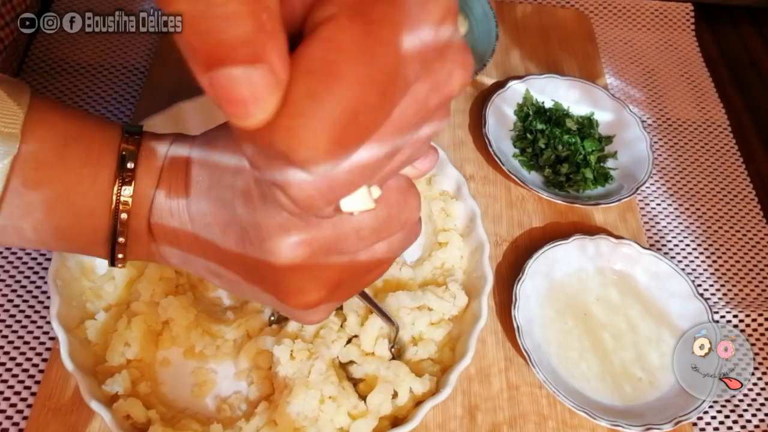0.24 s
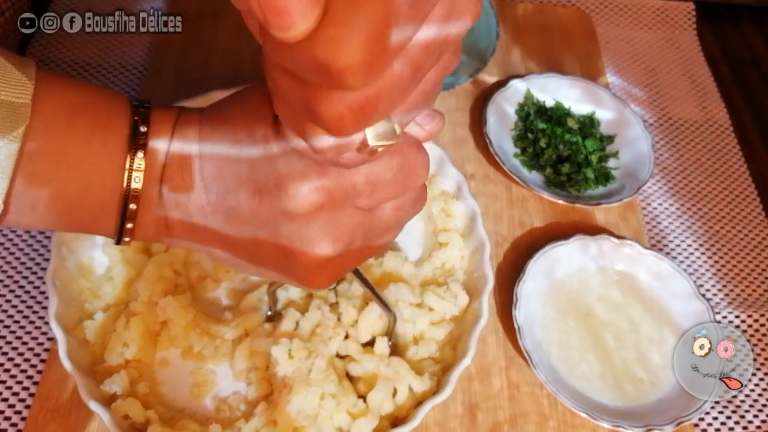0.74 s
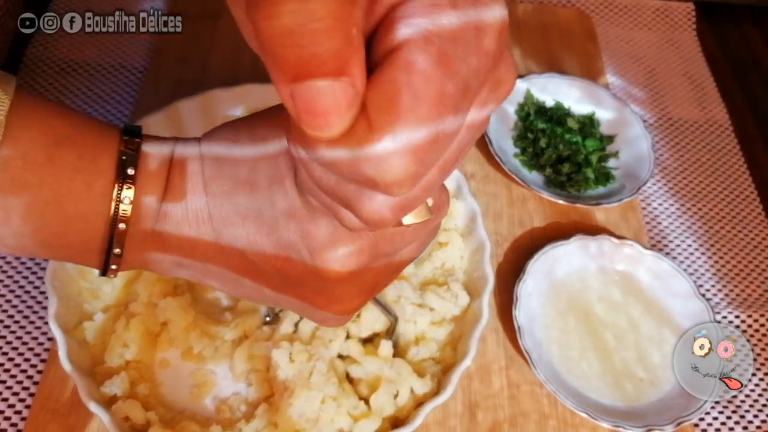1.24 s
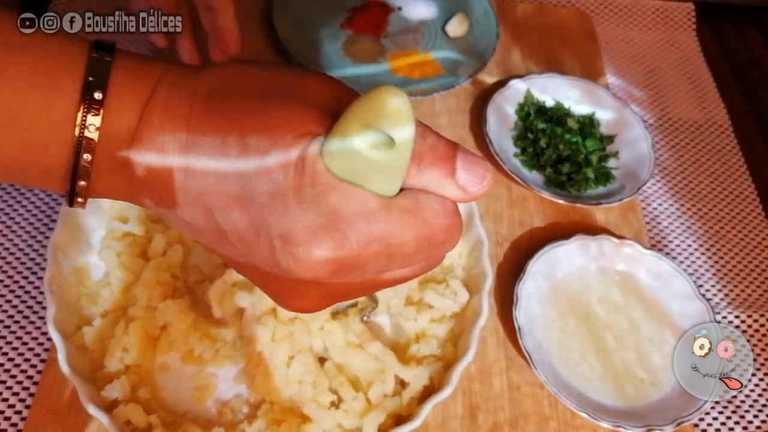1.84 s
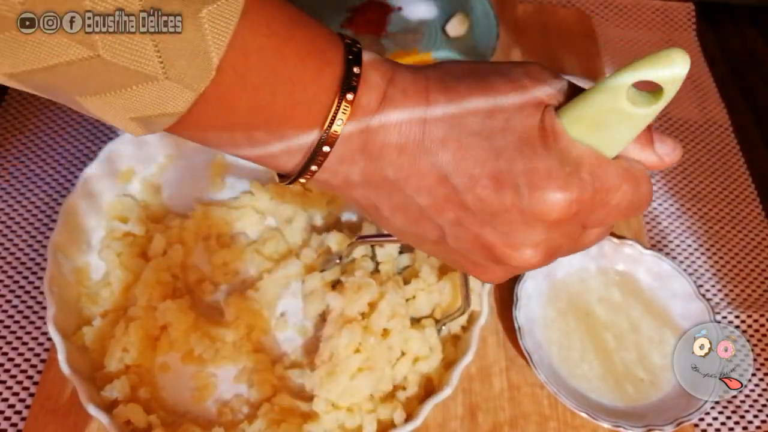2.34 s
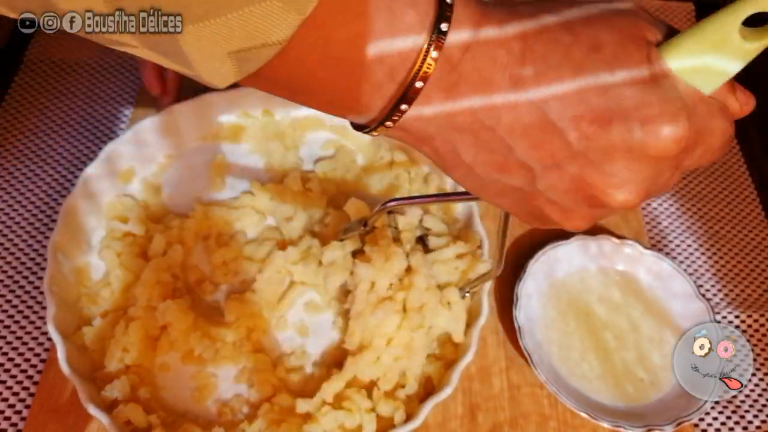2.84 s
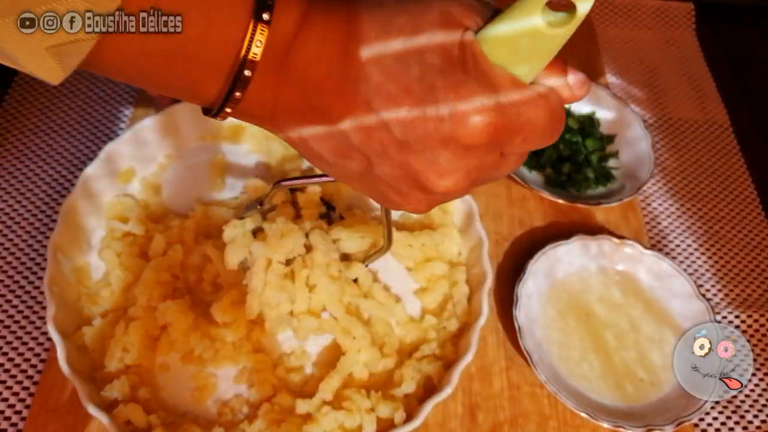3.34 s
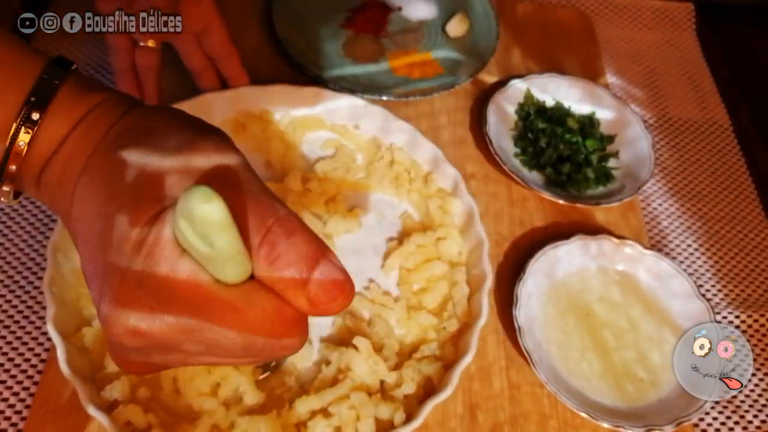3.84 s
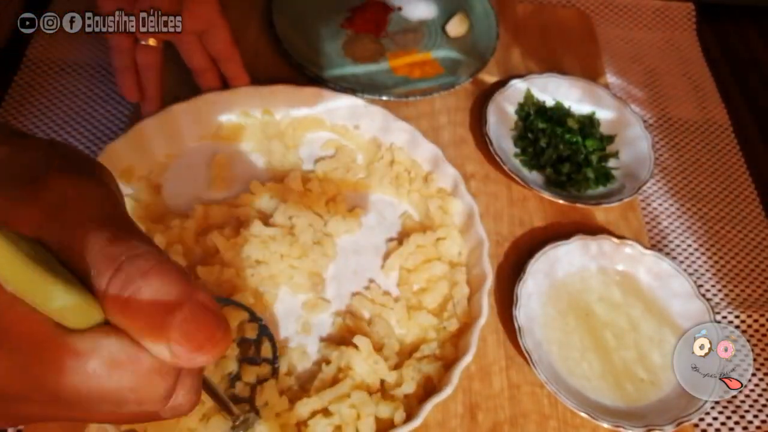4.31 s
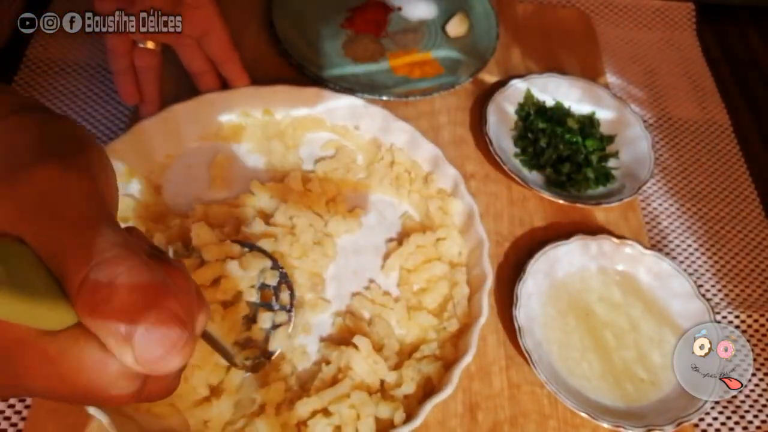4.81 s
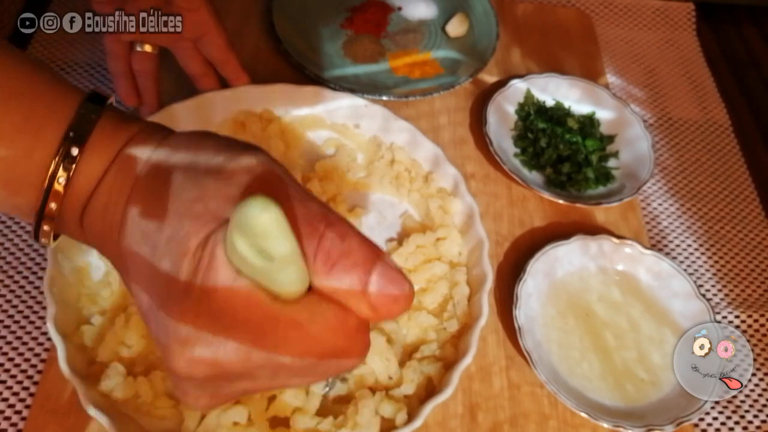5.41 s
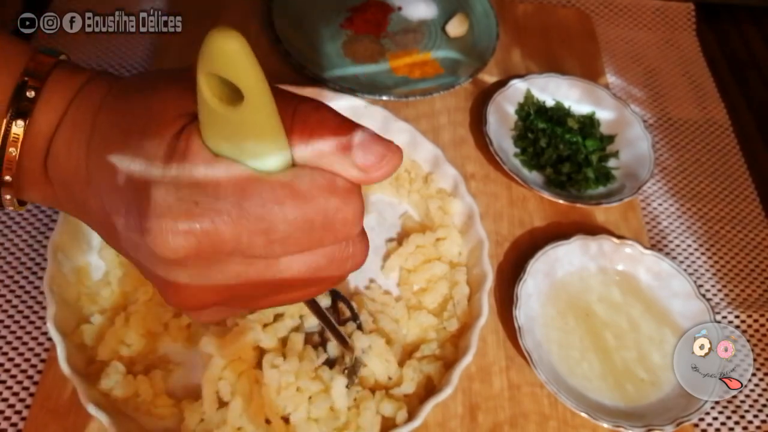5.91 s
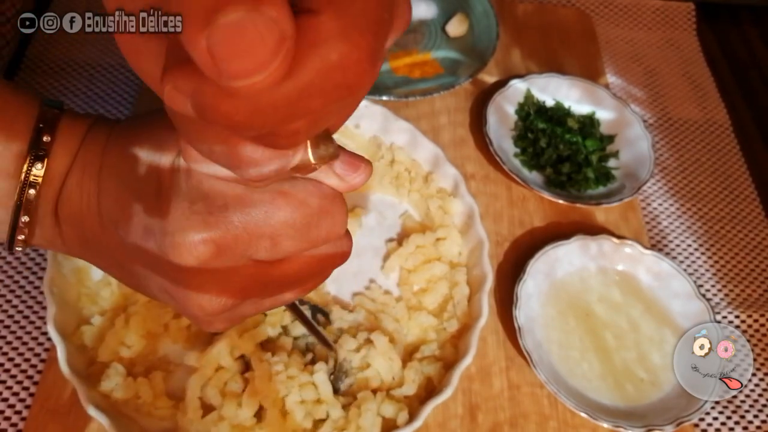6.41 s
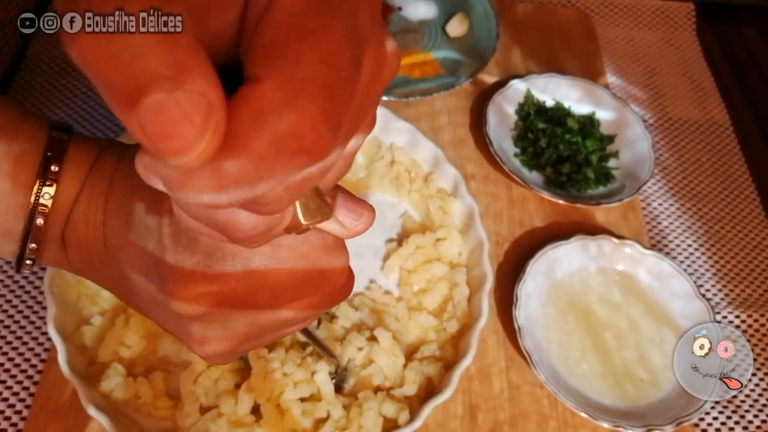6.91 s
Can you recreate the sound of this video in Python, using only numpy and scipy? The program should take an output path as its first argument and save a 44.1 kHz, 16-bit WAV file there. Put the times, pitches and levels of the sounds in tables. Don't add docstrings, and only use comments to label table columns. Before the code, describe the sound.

Close stereo pickup of potato being mashed on a table: low, hollow bowl-and-table thuds with short ringing, soft crunch after each blow, tiny sticky ticks and faint moist fizz between. After a strong first thud comes a pause, then knocks of varied strength, one quick scrape, a faint clink, a hard heavy blow, and a dull last knock over quiet room rumble and hiss.

```python
import sys
import numpy as np
from scipy import signal
from scipy.fft import rfft, irfft
from scipy.io import wavfile

SR = 44100
rng = np.random.default_rng(int(sys.argv[2]) if len(sys.argv) > 2 else 0)


def gain_from_decibels(decibels):
    exponent = np.asarray(decibels, float) / 20
    return 10 ** exponent


def file_out(sig):
    cols = np.atleast_2d(sig).T
    lim = np.clip(cols, -1, 1)
    pcm = np.round(lim * 32767).astype(np.int16)
    wavfile.write(sys.argv[1], SR, pcm)


N = 315756
TIME = np.arange(N) / SR

# [t/s, blow level/dB, boom level/dB, hardness above 2 kHz/dB, left-right level/dB]
KNOCKS = [
    (0.0731, -13.5, -25.5, -4, -2),
    (1.6758, -38.5, -52, 7, 3),
    (2.2767, -29, -43, 9.5, 4),
    (2.8057, -19, -31.5, 3, 4),
    (3.5184, -17, -31.5, 5.5, 2.5),
    (4.2832, -21, -33.5, 3, 6.5),
    (5.2393, -14, -28, 7.5, 2),
    (5.7290, -33, -45, 9.5, -6.5),
    (6.2533, -33.5, -32, 2, -1),
    (7.0357, -21.5, -28, -5.5, 4),
]


def rms_one(x):
    return x / np.sqrt(np.mean(x ** 2) + 1e-20)


def at_hz(points, hz):
    table_hz, values = np.transpose(points)
    return np.interp(np.log(np.maximum(hz, 1)), np.log(table_hz), values)


def in_time(rows):
    return gain_from_decibels(np.interp(TIME, *np.transpose(rows), left=-140, right=-140))


def panned(x, pan_db):
    return x * gain_from_decibels(np.array([[.5], [-.5]]) * pan_db)


def colour(x, points, share=1):
    size = 16384
    curve_db = share * at_hz(points, np.fft.rfftfreq(size, 1 / SR))
    cepstrum = irfft(np.log(gain_from_decibels(curve_db)))
    cepstrum[1:size // 2] *= 2
    cepstrum[size // 2 + 1:] = 0
    response = irfft(np.exp(rfft(cepstrum)))
    return signal.fftconvolve(x, response[None], axes=-1)[:, :N]


def ring(hz, level_db, t60, size, lead=0):
    t = TIME[:size]
    return gain_from_decibels(level_db - 60 * t / t60) * np.sin(2 * np.pi * hz * t + lead)


def drift(rate):
    knots = rng.standard_normal(400)
    return 0.68 * np.interp(TIME * rate, np.arange(400), knots)


def stereo_noise(size):
    # [f/Hz, left-right likeness/1]
    likeness = [(30, 0.87), (60, 0.68), (150, 0.83), (380, 0.82), (950, 0.029), (2400, 0.0059),
                (15000, .01)]
    alike = at_hz(likeness, np.fft.rfftfreq(size, 1 / SR))
    mid, side = rfft(rng.standard_normal((2, size)))
    return irfft(np.sqrt(1 + alike) * mid + np.sqrt(1 - alike) * side * [[1], [-1]], size)


def grains(per_s, spread_db):
    born = rng.random((3, N)) < per_s / SR
    size_db = spread_db * np.minimum(rng.exponential(1, (3, N)), 4)
    clicks = born * gain_from_decibels(size_db) * rng.choice([-1, 1], (3, N))
    return clicks[:2] + 0.52 * clicks[2]


def bursts(events):
    size = 16000
    out, t = np.zeros((2, N + size)), TIME[:size]
    for s, peak_db, hz, pan_db, t60 in events:
        noise = rng.standard_normal((3, size))
        swell = 1 - np.exp(-t / (0.29 * t60 ** 2 + 1e-4))
        burst = (noise[:2] + 0.46 * noise[2]) * gain_from_decibels(peak_db + 5 - 60 * t / t60) * swell
        spread = 1.5 if t60 < .09 else 1.25
        band = signal.butter(1, [hz / spread, min(hz * spread, 15000)], "band", fs=SR)
        i = round(s * SR)
        out[:, i:i + size] += panned(signal.lfilter(*band, burst), pan_db)
    return out[:, :N]


def room_tail(size, points):
    # [f/Hz, t60/s]
    tail_t60 = [(130, 0.58), (420, 0.45), (1100, 0.43), (2900, 0.39), (8000, 0.4)]
    white, out, t = stereo_noise(size), 0, TIME[:size]
    for hz in 125 * 2. ** np.arange(7):
        octave = signal.butter(2, [hz / 2 ** .5, hz * 2 ** .5], "band", fs=SR, output="sos")
        late = gain_from_decibels(-60 * t / at_hz(tail_t60, hz))
        early = gain_from_decibels(8 - 60 * t / 0.016)
        out = out + signal.sosfilt(octave, white) * (late + early)
    return colour(out * (1 - np.exp(-t / 0.00092)), points)[:, :size]


def rumble():
    # [f/Hz, spectral level/dB per Hz]
    rumble_colour = [(12, -37), (27, -28.5), (41, 2.5), (53, -11), (64, -3), (80, -20), (102, -6.5),
                     (118, -10.5), (135, -16), (180, -51)]
    level_db = -55 + 1.5 * drift(5)
    return gain_from_decibels(level_db) * rms_one(colour(stereo_noise(N), rumble_colour))


def shifting_mash():
    # [t/s, level/dB]
    mash = [(0.0, -62), (1.54, -66), (3.81, -64.5), (4.77, -65.5), (6.28, -62), (6.84, -65), (7.16, -62.5)]
    # [f/Hz, spectral level/dB per Hz]
    mash_colour = [(110, -20.5), (145, -9), (195, 1.5), (250, -7), (290, -10.5), (520, -11.5), (700, -14.5),
                   (900, -16), (1300, -21), (2600, -42), (5000, -84)]
    return gain_from_decibels(1.5) * in_time(mash) * rms_one(colour(stereo_noise(N), mash_colour))


def hiss():
    # [f/Hz, spectral level/dB per Hz]
    hiss_colour = [(600, -31), (1100, 0), (1500, 2), (2500, 3.5), (2950, 3), (3350, 0.5), (3900, -10.5),
                   (4600, -6.5), (5200, -0.5), (6300, -2), (7700, -19), (9600, -11.5), (12200, -42),
                   (14900, -19), (16000, 1.5)]
    level_db = -65 + 0.2 * drift(5.1)
    return gain_from_decibels(level_db) * rms_one(colour(stereo_noise(N), hiss_colour))


def whine():
    # [f/Hz, rms level/dB]
    tones = [(545, -86.5), (2914, -86.5)]
    out = 0
    for hz, db in tones:
        level_db = db + 7.5 + 0.99 * drift(3.92)
        out = out + gain_from_decibels(level_db) * np.sin(2 * np.pi * hz * TIME + 2.7 * drift(4.3))
    return out


def squeezes():
    # [peak t/s, peak level/dB, length/s]
    squeeze_events = [(0.0, -70.5, .1), (0.407, -74, 0.1), (0.504, -67, 0.033), (.56, -65, 0.095),
                      (0.864, -73, 0.75), (1.612, -69.5, 0.35), (1.816, -70.5, 0.076), (2.125, -70.5, 0.26),
                      (2.36, -63.5, 0.12), (2.485, -70, 0.16), (2.96, -72.5, 0.21), (3.126, -71, 0.17),
                      (3.798, -76, 0.13), (3.938, -64.5, 0.062), (4.278, -85, 0.084), (4.612, -69.5, 0.18),
                      (4.699, -66.5, 0.095), (5.017, -68.5, 0.14), (5.22, -73, 0.64), (5.62, -70.5, 0.3),
                      (6.07, -74, 0.19), (6.209, -63.5, 0.092), (6.311, -61.5, 0.12), (6.893, -71, 0.89),
                      (7.042, -65, 0.033), (7.16, -69, .12)]
    swell_db, fade_db, seep_db = 17.5, 22.5, -82.5
    power = gain_from_decibels(seep_db) ** 2
    for s, peak_db, length in squeeze_events:
        late = (TIME - s) / length
        power = power + gain_from_decibels(peak_db + np.minimum(swell_db * late, -fade_db * late)) ** 2
    return np.sqrt(power)


def squelch():
    # [f/Hz, spectral level/dB per Hz]
    squelch_colour = [(880, -44.5), (1500, -2.5), (2120, -30), (2880, -6), (3960, -14), (5170, -5),
                      (7760, -11.5), (9560, -9), (12100, -18.5), (14900, -14.5), (16000, -36)]
    pops = rms_one(grains(1500 * gain_from_decibels(4 * drift(25)), spread_db=8.5))
    wet = colour(0.7 * pops + 0.68 * stereo_noise(N), squelch_colour)
    return gain_from_decibels(4) * squeezes() * rms_one(wet)


def ticks():
    # [t/s, peak level/dB, f/Hz, left-right level/dB]
    releases = [(0.068, -66, 5400, 6), (0.493, -46.5, 5130, -12.5), (0.547, -60, 5100, -4),
                (1.8044, -52, 7000, 7), (2.278, -40.5, 9700, 11.5), (3.0558, -55, 5900, -4),
                (3.9168, -52, 5300, -4), (4.3050, -56, 5540, 20), (4.474, -58, 9500, 12),
                (4.591, -52, 9500, 11), (4.6765, -45.5, 9500, 19), (5.476, -53.5, 6100, 4),
                (5.9176, -53, 6000, 7), (6.1725, -50, 10000, 6), (6.96, -51, 9500, 7),
                (7.1200, -55, 5930, 0), (0.494, -45, 13500, 0), (3.898, -60, 13000, 0),
                (3.928, -49.5, 5600, -7), (4.045, -65, 9000, 7)]
    t60 = 0.014
    return bursts([(*row, t60) for row in releases])


def struck(modes, luck, size):
    longest_ring = .28
    mode_hz = np.array(modes)[:, 0]
    leads = np.cos(2.25 * np.arange(len(modes))) * np.minimum(mode_hz / 500, 1.3)
    rings = 0
    for (hz, db, t60, pan_db), v, lead in zip(modes, luck, leads):
        port_lead = lead * np.array([[.5], [-.5]])
        mode = ring(hz * (1 + v / 120), db - 15.5 + 2.64 * v, min(t60, longest_ring), size, port_lead)
        rings = rings + panned(mode, pan_db)
    return -rings * (1 - np.exp(-(TIME[:size] / 0.0025) ** 2))


def first_swing(t):
    # [f/Hz, level/dB, time to peak/ms]
    thump = [(406, -5, 1.7), (1020, -19.5, 0.98), (1603, -19, 0.75), (2680, -26.5, 0.62)]
    out = 0
    for hz, db, ms in thump:
        x = t * 1000 / ms
        out = out - gain_from_decibels(db) * x * np.exp(1 - x) * np.sin(2 * np.pi * hz * t)
    return out


def knocks():
    # [f/Hz, level/dB, t60/s]
    boom_modes = [(102.03, -1, 0.6), (114, -10, 0.51), (66, -14, 0.32)]
    # [f/Hz, level/dB, t60/s, left-right level/dB]
    body_modes = [(295, -20, 0.61, 21), (351.8, -2, 0.44, 10), (365, -1.5, 0.6, 1), (400, -12, 0.57, -19.5),
                  (456, -6.5, 0.44, 14), (458, -11.5, 0.46, 20), (562, -27, 0.095, 13),
                  (671, -3.5, 0.098, 6), (753, -28.5, 0.45, -4), (999, -20.5, 0.16, 17),
                  (1080, -10, 0.11, -2), (1288, -25.5, 0.27, -11), (1500, -16, 0.15, 2),
                  (2350, -45, 0.39, 21), (2870, -38.5, 0.31, 21)]
    # [f/Hz, level/dB, t60/s, left-right level/dB]
    thud_modes = [(160, -23, 0.85, -10), (173.9, 2, 0.36, -4), (197.6, 2.5, 0.29, 4.5),
                  (240.4, -2, 0.27, 1)]
    # [f/Hz, spectral level/dB per Hz]
    tail_colour = [(76, -8.5), (130, -3), (289, -9.5), (373, -5), (609, -8.5), (1280, -21), (2210, -29.5),
                   (3360, -36), (4110, -56.5), (5590, -38.5), (10000, -105), (13000, -61), (22000, -120)]
    # [blow level/dB, knock level/dB]
    bite = [(-32.5, -7), (-28, 7), (6, 1.5), (-13, -3)]
    size = 40000
    out, t = np.zeros((2, N + size)), TIME[:size]
    tails = np.array([room_tail(size, tail_colour), room_tail(size, tail_colour)])
    tails *= gain_from_decibels(-23.5) / np.sqrt(np.mean(tails[..., :4000] ** 2))
    luck = rng.standard_normal((len(KNOCKS), 2, len(body_modes)))
    first = first_swing(t)
    boom = sum(ring(*mode, size) for mode in boom_modes) * (1 - np.exp(-t / 0.0016))
    for (s, blow_db, boom_db, hard_db, pan_db), (vary, vary_low) in zip(KNOCKS, luck):
        thud_db = -6 + 0.36 * blow_db + 0.33 * boom_db
        knock_db = np.interp(blow_db, *np.transpose(bite))
        turn = vary_low[-1]
        tail = np.cos(turn) * tails[0] + np.sin(turn) * tails[1]
        blow = panned(first, pan_db) + struck(body_modes, vary, size) + tail
        contact = [(140, -4), (250, -3), (520, -3), (750, knock_db), (1600, hard_db), (6000, 1.63 * hard_db)]
        blow = colour(blow, contact)[:, :size]
        thud = struck(thud_modes, vary_low, size)
        i = round(s * SR)
        out[:, i:i + size] += gain_from_decibels(blow_db) * blow + gain_from_decibels(boom_db) * boom - gain_from_decibels(thud_db) * thud
    return out[:, :N]


def cracks():
    # [t/s, peak level/dB, f/Hz, left-right level/dB]
    contacts = [(0.074, -45.5, 5400, 3), (1.6755, -43.5, 2500, -11), (2.2778, -31, 2950, -8.5),
                (2.2778, -41, 4900, 8), (2.807, -57, 3000, 0), (3.52, -41.5, 2980, -7.5),
                (4.2836, -49.5, 3000, -4), (4.7048, -63, 3000, 0), (5.2408, -47, 4370, -12),
                (5.7292, -54, 2170, 12), (6.245, -46, 5800, -4), (6.2526, -47, 6000, 0),
                (6.2537, -44, 2500, -14), (7.0362, -60, 3000, -2), (0.196, -50, 1500, -3),
                (4.7042, -47, 1300, 8)]
    t60 = 0.016
    return bursts([(*row, t60) for row in contacts])


def grit():
    # [f/Hz, level re blow/dB, t60/s]
    crunch = [(1490, -28.5, 0.37), (2600, -36.5, 0.31)]
    events = []
    for s, blow_db, _, hard_db, pan_db in KNOCKS:
        for hz, db, t60 in crunch:
            events.append((s + .004, blow_db + db + 0.8 * hard_db, hz, pan_db, t60))
    return bursts(events)


def slumps():
    # [t/s, peak level/dB, f/Hz, left-right level/dB, t60/s]
    slides = [(1.674, -38.5, 1120, -5, 0.091), (1.68, -33.5, 440, 5, 0.3), (6.256, -36, 330, -3, 0.22),
              (2.281, -28, 530, 1, 0.17), (3.5, -53, 5300, -4, 0.28), (4.96, -43, 850, -2, 0.47),
              (6.3, -54, 1900, 10, 0.26), (.53, -56, 5100, -10, 0.18), (7.042, -48, 1000, 4, 0.16),
              (5.2, -67, 13000, -3, .3), (7.152, -50, 1700, 5, 0.038)]
    return bursts(slides)


def scrape():
    # [t/s, level/dB]
    drag = [
        (2.285, -60),
        (2.31, -63),
        (2.335, -49.5),
        (2.36, -48.5),
        (2.39, -48.5),
        (2.415, -55),
        (2.44, -67),
        (2.478, -64),
        (2.52, -76),
    ]
    # [f/Hz, spectral level/dB per Hz]
    scrape_colour = [(290, -26), (500, 4.5), (851, -19), (1390, -2.5), (1830, -8.5), (2430, -3.5),
                     (3190, -7.5), (6310, -12), (7430, -27), (13000, -58)]
    slips = grains(1900 * gain_from_decibels(4 * drift(50)), spread_db=2.5)
    return in_time(drag) * rms_one(colour(slips, scrape_colour))


def clink():
    # [f/Hz, level/dB, free t60/s]
    wires = [(1518, -9, 1.0), (2412, -5.5, .4), (3284, -10, .45), (4200, -11, .14), (5208, -9, .3),
             (6288, -8, .2), (7500, -12, .1)]
    size, clink_s, clink_db = 16000, 4.705, -54
    out = np.zeros((2, N))
    i = round(clink_s * SR)
    out[:, i:i + size] += sum(ring(hz, db + clink_db, .45 * t60, size) for hz, db, t60 in wires)
    return out


def in_housing(x):
    # [f/Hz, level/dB]
    housing = [(3000, -0.5), (3900, -6), (5200, 0), (6400, -0.5), (7800, -12), (9700, -6), (12200, -32),
               (15000, -19)]
    return colour(x, housing)


def echoed(x):
    # [f/Hz, level/dB]
    crack_echo = [(300, -33), (1200, -33.5), (2500, -31.5), (3900, -45.5), (5600, -42), (8000, -51),
                  (14000, -52)]
    answer = room_tail(20000, crack_echo)
    return x + signal.fftconvolve(x.mean(0, keepdims=True), answer, axes=-1)[:, :N]


def scene():
    background = rumble() + shifting_mash() + hiss() + whine()
    close = in_housing(ticks() + cracks() + grit() + slumps() + clink())
    return background + squelch() + knocks() + echoed(close + scrape())


def low_pass(x):
    return signal.sosfilt(signal.butter(12, 15720, fs=SR, output="sos"), x)


def record(dry):
    # [f/Hz, left-right level/dB]
    ports = [(60, 2), (92, 1), (140, -0.5), (210, 0), (330, -3.5), (500, -1.5), (770, 0), (1170, -1),
             (1790, -1), (2740, -3.5), (4190, -5), (6410, -13.5), (9810, 15.5), (15000, -5.5)]
    left = colour(dry[:1], ports, share=0.45)
    right = colour(dry[1:], ports, share=-0.61)
    top_cut = signal.cheby2(24, 60, 15850, fs=SR, output="sos")
    mix = signal.sosfilt(top_cut, np.vstack([left, right]))
    return low_pass(mix)


dry = scene()
out = record(dry)
file_out(out)
```